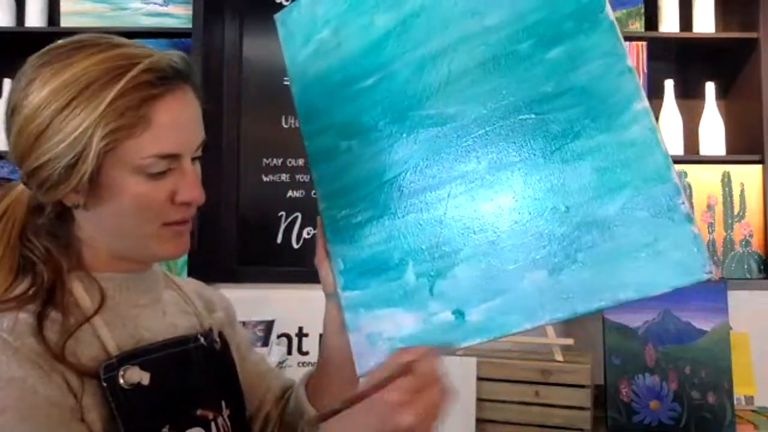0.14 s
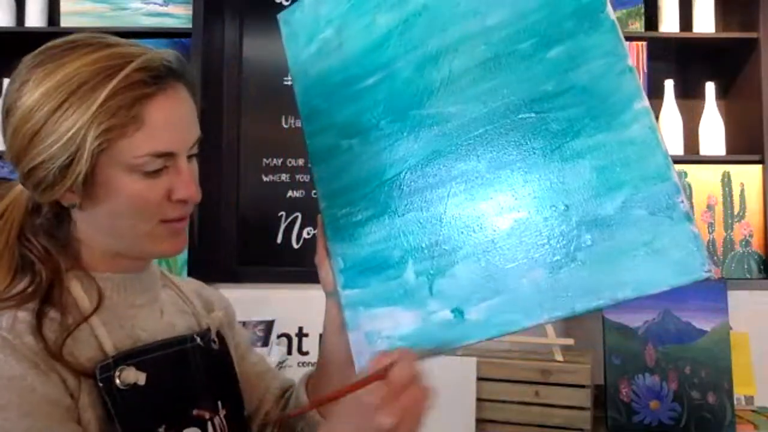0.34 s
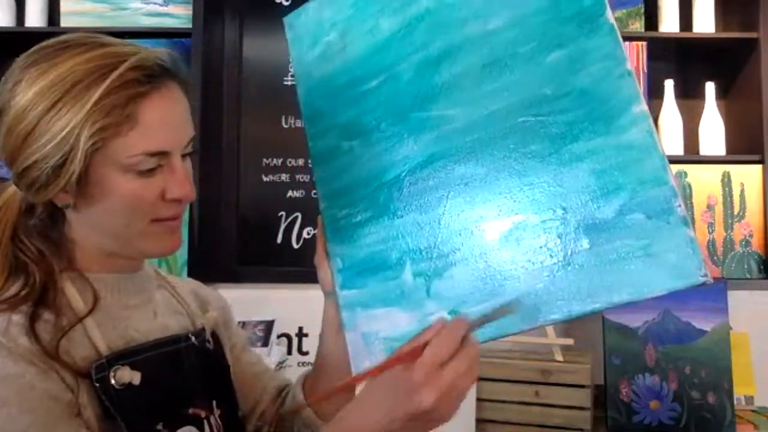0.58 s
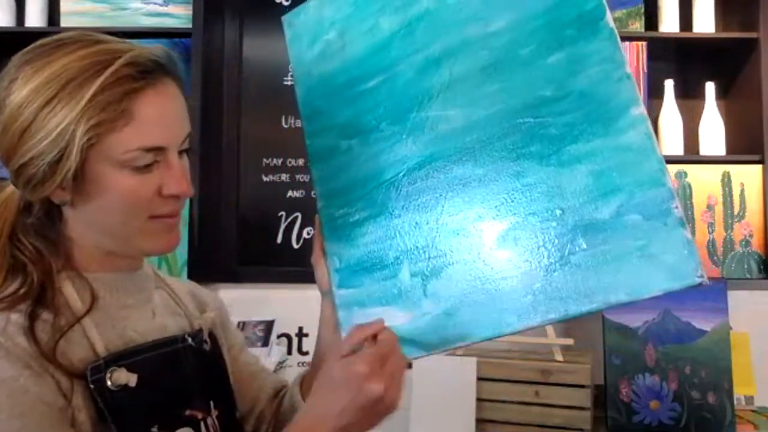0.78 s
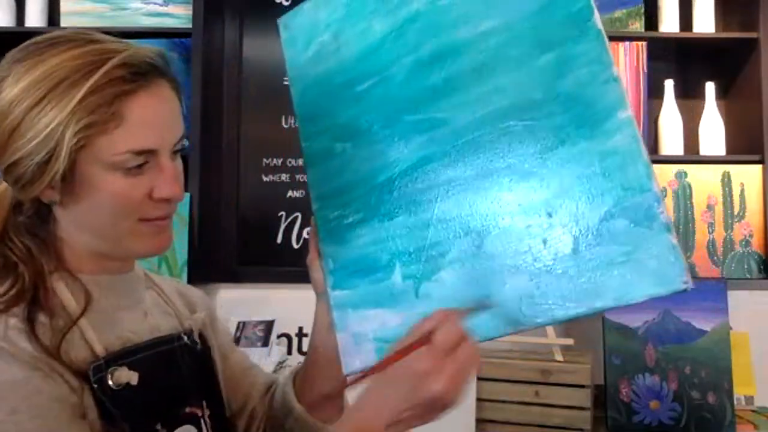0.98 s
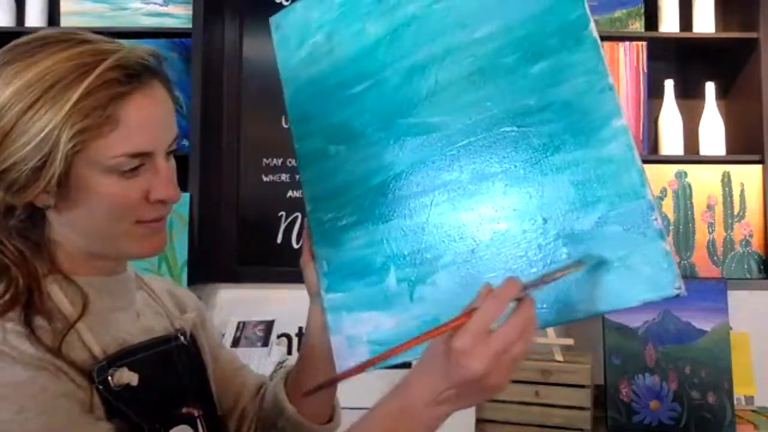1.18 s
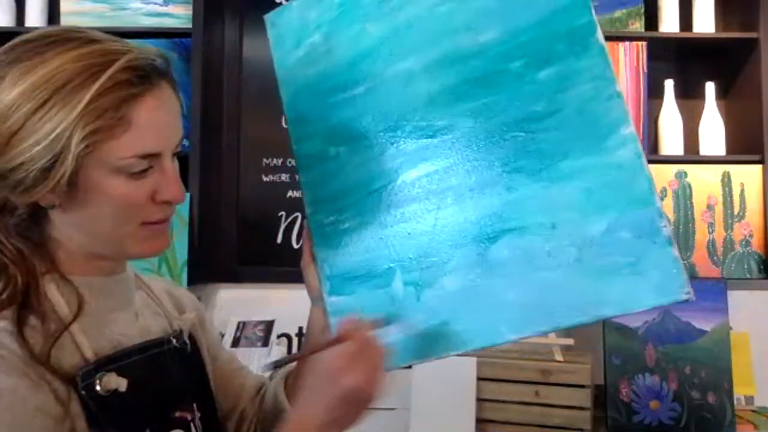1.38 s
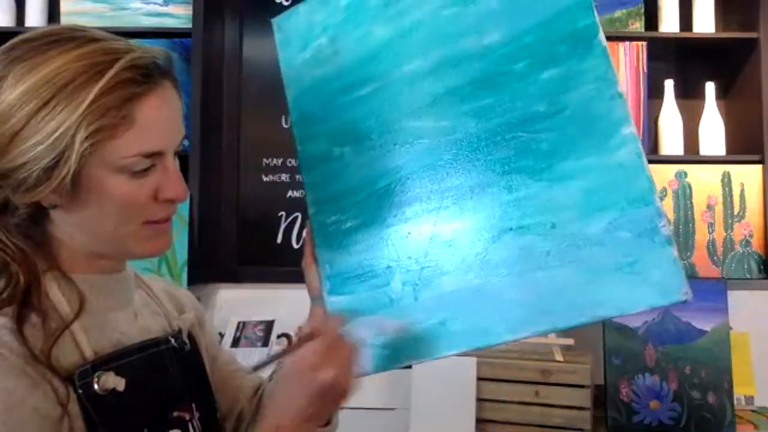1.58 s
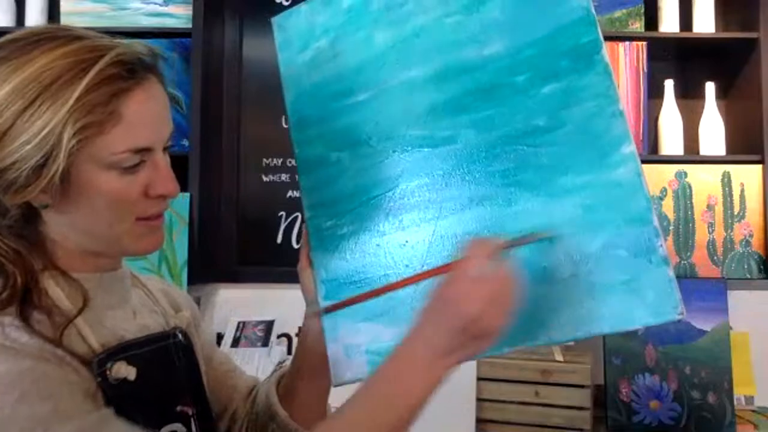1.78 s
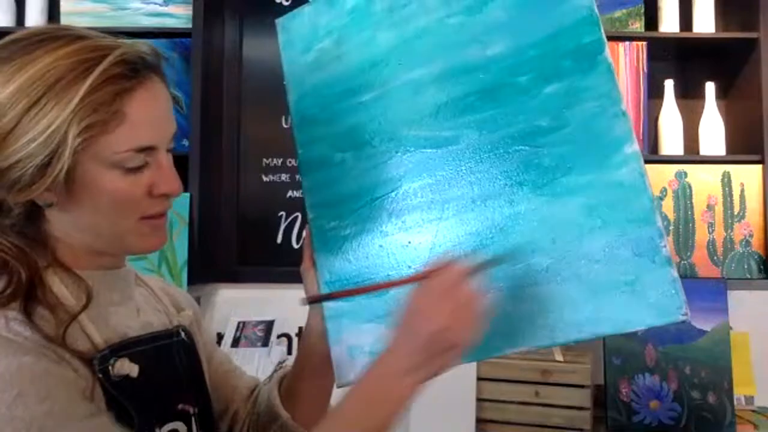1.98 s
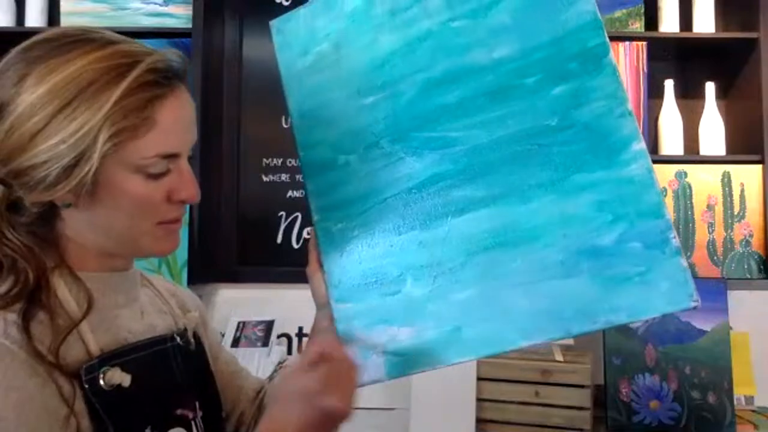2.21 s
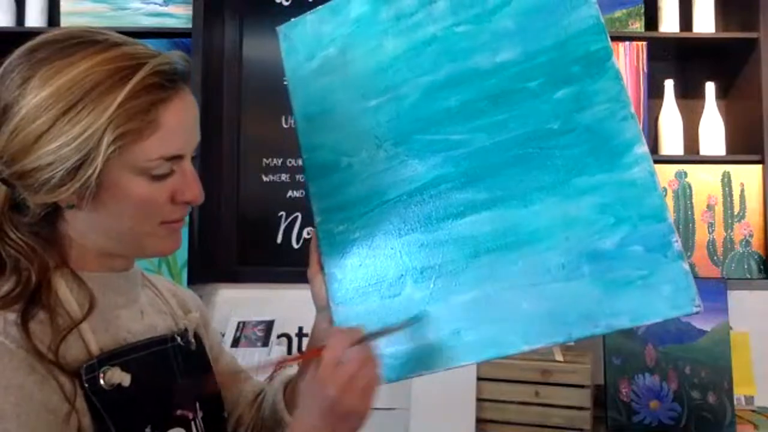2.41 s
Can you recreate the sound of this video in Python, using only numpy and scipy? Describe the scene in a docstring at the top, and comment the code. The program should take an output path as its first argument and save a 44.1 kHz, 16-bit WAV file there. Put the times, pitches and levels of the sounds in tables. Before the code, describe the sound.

A stiff brush scrubs paint on a hand-held stretched canvas: short airy hisses, one sharper scrape early on, then softer strokes and another raspy one near the end, picked up by one microphone in a quiet room.

```python
"""A quiet room, one microphone: a stiff brush scrubs paint back and forth over a hand-held stretched canvas.
Bristle tips slip over the weave as a bright hiss of dense random clicks; pressed harder they rasp in lower bands.
Bristles crossing the threads whistle as gliding narrow noise, and a few snap free as short rings.
Faint low narrow noise, likely left by a noise suppressor, swells, holds and fades under some strokes.
Faint coloured room noise with a little mains hum lies below."""
import sys
import numpy as np
from scipy import signal
from scipy.fft import rfft, irfft, next_fast_len
from scipy.io import wavfile
from scipy.ndimage import uniform_filter1d

SR = 44100
rng = np.random.default_rng(int(sys.argv[2]) if len(sys.argv) > 2 else 0)


def generate_wav(signal):
    """Clip the signal to [-1, 1] and save it as 16-bit WAV at the path in sys.argv[1]."""
    frames = np.transpose(np.atleast_2d(signal))
    scaled = np.clip(frames, -1, 1) * 32767
    pcm = np.round(scaled).astype(np.int16)
    wavfile.write(sys.argv[1], SR, pcm)


def field_ratio(decibels):
    """Amplitude ratio for a level in dB (20 dB per decade); scalars and array-likes work."""
    return 10 ** (np.asarray(decibels, dtype=float) / 20)


N = 108045  # length [samples]


def rms_one(x):
    """Scale to unit rms."""
    return x / np.sqrt(np.mean(x ** 2) + 1e-20)


def in_time(rows):
    """Columns of a time table as curves per sample."""
    seconds, *columns = np.transpose(rows)
    return [np.interp(np.arange(N) / SR, seconds, column) for column in columns]


def coloured(x, spectrum):
    """Shape a signal by a spectrum table, straight in dB over log frequency; rms 1."""
    hz, db = np.transpose(spectrum)
    size = next_fast_len(len(x))
    bins_hz = np.maximum(np.arange(size // 2 + 1) * SR / size, 1)
    gain = field_ratio(np.interp(np.log(bins_hz), np.log(hz), db))
    return rms_one(irfft(rfft(x, size) * gain, size)[:len(x)])


def drift(rate_hz, size):
    """Slow chance: noise through a double one-pole lowpass, rms 1."""
    pole = np.exp(-2 * np.pi * rate_hz / SR)
    noise = rng.standard_normal(size + SR // 2)
    settled = signal.lfilter([1], [1, -2 * pole, pole * pole], noise)[SR // 2:]
    return rms_one(settled)


def narrow_noise(hz, width_hz):
    """Noise gathered round a moving pitch, its beating partly evened; rms 1."""
    wobble = drift(width_hz, len(hz)) + 1j * drift(width_hz, len(hz))
    wobble = wobble / (np.abs(wobble) + 0.295) ** 0.34
    carrier = np.exp(2j * np.pi * np.cumsum(hz) / SR)
    return rms_one(np.real(wobble * carrier))


def swells(rows, rise_share, haste):
    """Each row is a narrow noise that swells and fades while its pitch glides; haste above 1 leaves time to hold."""
    out = np.zeros(N)
    for start_s, length_s, db, from_hz, to_hz, width_hz in rows:
        i = int(start_s * SR)
        size = min(int(length_s * SR), N - i)
        along = np.arange(size) / size
        ramp = np.minimum(along / rise_share, (1 - along) / (1 - rise_share))
        shape = np.sin(np.pi / 2 * np.minimum(haste * ramp, 1)) ** 1.37
        pitch_hz = np.linspace(from_hz, to_hz, size)
        out[i:i + size] += field_ratio(db) * shape * narrow_noise(pitch_hz, width_hz)
    return out


def room():
    """Steady room noise with a slowly drifting level and a little mains hum."""
    # colour of the room noise: (frequency [Hz], relative level [dB per Hz])
    room_colour = [(20, -36), (50, -36.5), (100, -7), (230, 1), (425, -10.5), (600, -12.5), (900, -14.5),
                   (1800, -25), (2400, -24.5), (4200, -34.5), (6000, -34.5), (7500, -25.5), (10800, -23),
                   (15800, -32)]
    hum = field_ratio(-86.5) * narrow_noise(np.full(N, 120.6), width_hz=15.0)
    level_db = -82 + 1.6 * drift(8.0, N)
    return field_ratio(level_db) * coloured(rng.standard_normal(N), room_colour) + hum


def slips(spread_db):
    """Dense random bristle slips of uneven size and either sign."""
    slips_per_s = 15000
    sizes = field_ratio(spread_db * np.minimum(rng.exponential(1, N), 5)) * rng.choice([-1, 1], N)
    return sizes * (rng.random(N) < slips_per_s / SR)


def stepped(db):
    """Hold a level curve in even 20 ms blocks joined by short ramps."""
    step_s, ramp_s = 0.02, 0.0087
    size = int(step_s * SR)
    middles = np.arange(N) // size * size + size // 2
    held = db[np.minimum(middles, N - 1)]
    return uniform_filter1d(held, int(ramp_s * SR))


def streaky(spectrum, depth_db, rate_hz, count):
    """Slips in narrow neighbouring bands, each swelling on its own as bristles catch and let go; rms 1."""
    grains = coloured(slips(spread_db=3.5), spectrum)
    edges = np.geomspace(spectrum[1][0], spectrum[-2][0], count + 1)
    total = np.zeros(N)
    for pair in zip(edges, edges[1:]):
        band_filter = signal.butter(2, pair, "band", fs=SR, output="sos")
        total += field_ratio(depth_db * drift(rate_hz, N)) * signal.sosfilt(band_filter, grains)
    return rms_one(total)


def brush():
    """Five regions of the scrub: an even hiss of slips on top, streakier scratch and rasp below."""
    # brush strokes in the treble: (time [s], bristle hiss level [dB], upper scratch level [dB])
    stroke_treble = [(0.0, -89, -93), (0.03, -52.5, -81), (0.06, -43.5, -48.5), (0.07, -47, -63),
                     (0.12, -84, -99), (0.14, -91, -94), (0.17, -64, -81), (0.18, -55.5, -72.5),
                     (0.22, -37, -56), (0.24, -48.5, -50.5), (0.25, -40.5, -58.5), (0.32, -87.5, -95),
                     (0.35, -81, -84.5), (0.37, -44, -52.5), (0.38, -33.5, -45.5), (0.41, -32, -36),
                     (0.44, -35.5, -46), (0.48, -74, -78), (0.51, -81, -98), (0.54, -51, -64),
                     (0.56, -58, -80), (0.6, -49.5, -57.5), (0.62, -50, -66.5), (0.67, -92, -91),
                     (0.73, -87, -89), (0.77, -61, -74), (0.82, -82, -81.5), (0.89, -87, -98),
                     (0.9, -66.5, -84), (0.93, -50, -60.5), (0.96, -53, -67), (1.06, -47.5, -61.5),
                     (1.1, -55.5, -73), (1.13, -51, -69.5), (1.21, -86.5, -86.5), (1.25, -87, -112),
                     (1.28, -49.5, -60), (1.33, -48, -57), (1.39, -69, -75), (1.45, -48, -60),
                     (1.49, -46.5, -60), (1.52, -50.5, -61), (1.55, -73, -85), (1.6, -84, -86),
                     (1.69, -54.5, -69.5), (1.71, -61, -68.5), (1.77, -47, -62), (1.83, -68, -78),
                     (1.97, -93, -93.5), (1.99, -64, -68.5), (2.01, -49.5, -62.5), (2.05, -51, -66.5),
                     (2.11, -61.5, -77.5), (2.16, -44, -51), (2.2, -50.5, -65.5), (2.24, -85, -86),
                     (2.31, -84, -90), (2.35, -51.5, -62), (2.39, -49.5, -62), (2.45, -90, -96)]
    # pressure of the bristles into the weave, levels before the trims below:
    # (time [s], high rasp level [dB], rasp level [dB], low rasp level [dB])
    stroke_rasp = [(0.0, -94, -93, -92), (0.03, -80.5, -83, -81), (0.07, -75.5, -71.5, -84.5),
                   (0.14, -99, -102, -101), (0.23, -74.5, -73, -79), (0.33, -98, -100, -95.5),
                   (0.36, -98, -95, -89), (0.38, -52, -62, -87), (0.4, -46.5, -54, -90),
                   (0.43, -60.5, -65.5, -76), (0.47, -81, -89, -93), (0.52, -92, -89.5, -87),
                   (0.61, -74.5, -69, -71.5), (0.69, -102, -89, -100), (0.74, -95.5, -93, -91),
                   (0.77, -81.5, -78.5, -88.5), (0.87, -99, -101, -95), (0.96, -82.5, -86, -87),
                   (1.03, -76.5, -78, -76), (1.18, -84, -84, -82), (1.25, -98, -97, -95),
                   (1.32, -62, -70, -67.5), (1.34, -67, -80, -67), (1.37, -76.5, -73.5, -75),
                   (1.4, -85, -83, -82), (1.48, -70, -57.5, -66), (1.5, -65.5, -55, -66),
                   (1.6, -95, -93.5, -90.5), (1.73, -74.5, -76, -71.5), (1.78, -75, -67.5, -70.5),
                   (1.84, -88, -84, -81), (1.96, -99, -101, -95.5), (2.03, -73.5, -81, -72.5),
                   (2.05, -74, -75.5, -70.5), (2.12, -80.5, -78, -82), (2.16, -71, -51, -54),
                   (2.19, -65, -53, -67.5), (2.24, -90, -80, -82.5), (2.32, -96, -99, -89.5),
                   (2.35, -80, -77.5, -79), (2.38, -78, -78, -81.5), (2.45, -97, -98, -91.5)]
    # colours of the five regions, top to bottom: (frequency [Hz], relative level [dB per Hz])
    hiss_colour = [(11000, -59.5), (11850, -34), (12050, 5), (13500, 0), (15000, 5.5), (15900, -4.5)]
    scratch_colour = [(6000, -63), (7900, -28), (8600, -12), (9800, -8), (11000, 0), (11800, -0.5),
                      (12100, -20.5), (13000, -60)]
    high_colour = [(3800, -35.5), (4700, -7.5), (5300, 2.5), (6500, -4), (7600, -9.5), (8100, -18.5),
                   (10000, -75)]
    rasp_colour = [(2500, -49.5), (3200, -12.5), (3600, 3.5), (4300, 3.5), (4900, -10.5), (6000, -47.5)]
    low_colour = [(400, -18), (800, -16), (1200, -10), (1700, -3.5), (2400, -7), (3100, -2.5), (3500, -14),
                  (4500, -47)]

    hiss_db, scratch_db = map(stepped, in_time(stroke_treble))
    high_db, rasp_db, low_db = map(stepped, in_time(stroke_rasp))
    flicker_db = 0.65 * drift(110, N)
    hiss = field_ratio(hiss_db + flicker_db) * coloured(slips(spread_db=1.5), hiss_colour)
    scratch = field_ratio(scratch_db) * streaky(scratch_colour, depth_db=3.0, rate_hz=12.0, count=10)
    high_rasp = field_ratio(high_db - 1.0) * streaky(high_colour, depth_db=2.5, rate_hz=9.7, count=8)
    rasp = field_ratio(rasp_db - 3.5) * streaky(rasp_colour, depth_db=2.5, rate_hz=10.0, count=6)
    low_rasp = field_ratio(low_db - 2.0) * streaky(low_colour, depth_db=1.76, rate_hz=10.0, count=12)
    return hiss + scratch + high_rasp + rasp + low_rasp


def low_residue():
    """Faint low narrow noise, likely left by a noise suppressor, swells, holds and fades under some strokes."""
    # (start [s], length [s], level before the swell [dB], start pitch [Hz], end pitch [Hz], width [Hz])
    residue_rows = [(0.0, 0.1, -75.5, 252.1, 243, 41), (.5, .16, -79.5, 367.6, 369, 65),
                    (.5, 0.14, -78, 191.3, 188.5, 42), (1.04, 0.3, -70.5, 188, 200, 18),
                    (1.29, 0.22, -68.5, 320, 334, 36), (1.5, 0.092, -78.5, 200.4, 204, 40),
                    (1.67, 0.21, -72.5, 302.7, 220.8, 84), (1.99, 0.09, -73, 300.6, 340, 53),
                    (2.1, 0.1, -73, 337, 436, 66), (2.12, .14, -78, 233.3, 211, 21),
                    (2.36, 0.1, -82, 208, 203, 35)]
    return swells(residue_rows, rise_share=0.48, haste=2)


def whistles():
    """Bristles crossing the threads in step whistle: narrow noise that swells and fades without a hold. One
    row, a faint steady line near 1 kHz at 1.1 s, is not a whistle but swells and fades the same way."""
    # (start [s], length [s], level before the swell [dB], start pitch [Hz], end pitch [Hz], width [Hz])
    whistle_rows = [(0.045, 0.06, -70, 3650, 3600, 100), (.375, 0.065, -55, 3650, 3600, 70),
                    (0.377, 0.06, -52.5, 5000, 5200, 380), (.378, .065, -57, 6700, 7300, 490),
                    (.57, 0.069, -69.5, 3220, 3150, 120), (1.0, 0.063, -79.5, 6050, 6000, 170),
                    (1.085, .07, -79, 5350, 5500, 120), (1.01, 0.15, -82, 620, 580, 110),
                    (.99, .13, -75, 3050, 2600, 110), (.91, 0.089, -84, 3700, 3700, 120),
                    (1.1, .17, -84, 1045, 1060, 27), (.255, 0.05, -81, 1450, 1350, 60),
                    (.3, 0.08, -86, 1080, 1050, 35), (.21, 0.051, -75.5, 4700, 4700, 100),
                    (1.31, 0.064, -57.5, 2850, 3000, 115), (1.306, 0.0376, -58, 5600, 5720, 140),
                    (1.435, .11, -59, 3800, 3550, 110), (1.45, 0.058, -64, 1560, 1700, 72),
                    (1.7, 0.22, -82.5, 1600, 1500, 110), (1.75, 0.072, -77, 3300, 4600, 150),
                    (1.99, 0.075, -71.5, 5300, 5300, 150), (2.05, .11, -74, 3100, 3750, 70),
                    (2.02, 0.046, -74, 1900, 1800, 130), (2.04, 0.143, -76, 450, 540, 96),
                    (2.134, 0.091, -56, 3620, 3480, 130), (2.155, 0.061, -64.5, 4350, 4400, 49),
                    (2.138, 0.0637, -71.5, 1520, 2000, 160), (2.135, 0.09, -62.5, 2850, 2700, 110),
                    (0.98, 0.15, -64, 11150, 10600, 120), (0.506, 0.14, -68, 11600, 10200, 220),
                    (1.42, 0.088, -57, 14000, 11200, 290)]
    return swells(whistle_rows, rise_share=0.37, haste=1)


def ticks():
    """Single bristles catch a thread and snap free: each a short ring that rises fast and dies away."""
    # (time [s], envelope peak level [dB], pitch [Hz])
    tick_rows = [(.7605, -67, 4310), (2.163, -45.5, 3610), (2.34, -73, 4180)]
    rise_s = 0.0023
    out = np.zeros(N)
    for start_s, db, hz in tick_rows:
        age = np.maximum(np.arange(N) / SR - start_s, 0)
        envelope = age / rise_s * np.exp(1 - age / rise_s)
        out += field_ratio(db) * envelope * np.sin(2 * np.pi * hz * age)
    return out


def scene():
    """All layers add up at one microphone."""
    mix = room() + brush() + low_residue() + whistles() + ticks()
    return mix[None, :]


def low_pass(x):
    """Removes everything above the highest recorded frequency."""
    return signal.sosfilt(signal.butter(12, 15950, fs=SR, output="sos"), x)


def record(dry):
    """The microphone signal with its top cut steeply, 70 dB down from 16050 Hz."""
    top_cut = signal.cheby2(22, 70, 16050, fs=SR, output="sos")
    mix = signal.sosfilt(top_cut, dry)
    return low_pass(mix)


dry = scene()
out = record(dry)
generate_wav(out)
```